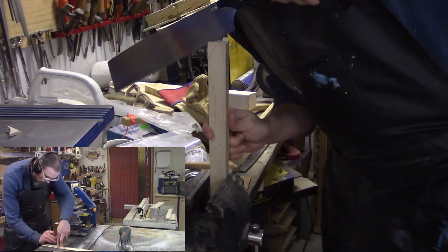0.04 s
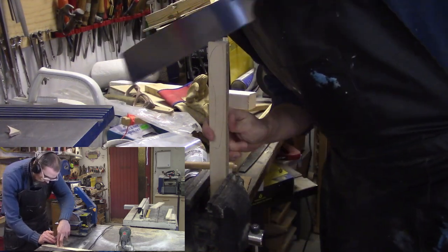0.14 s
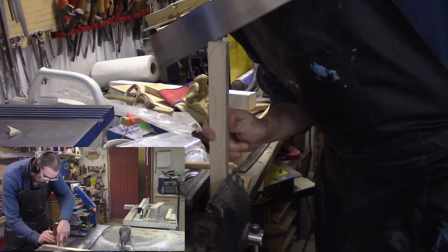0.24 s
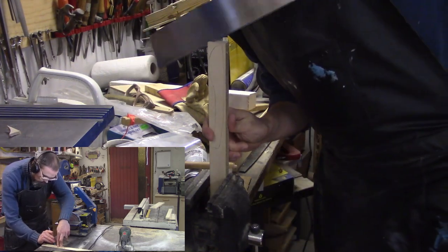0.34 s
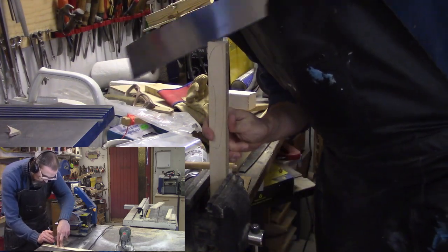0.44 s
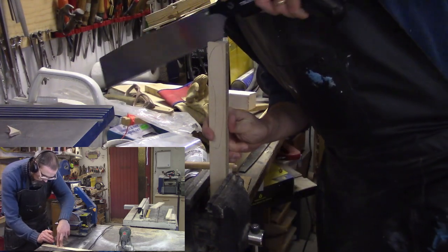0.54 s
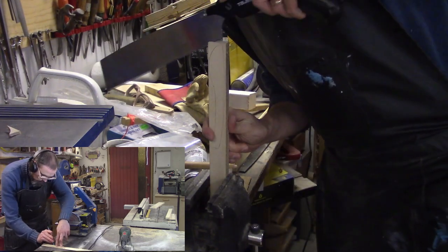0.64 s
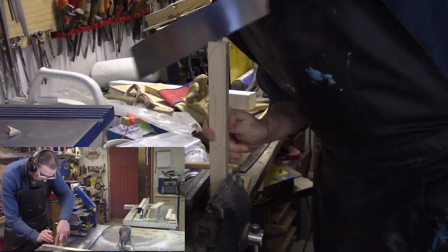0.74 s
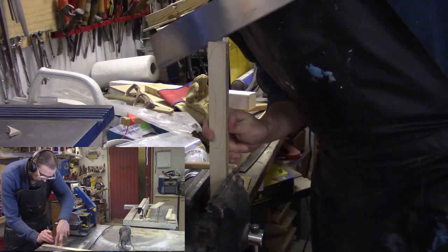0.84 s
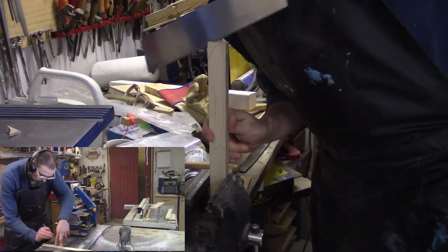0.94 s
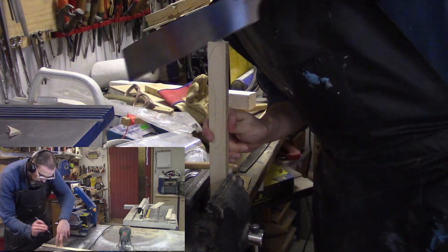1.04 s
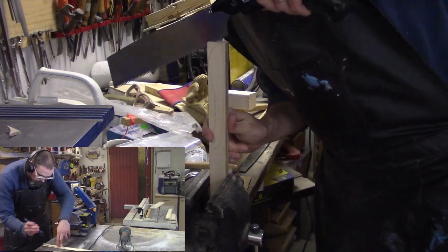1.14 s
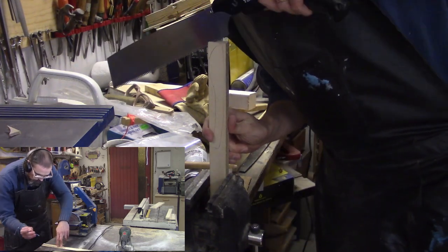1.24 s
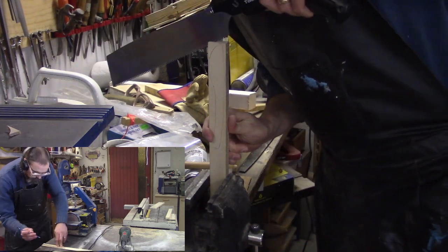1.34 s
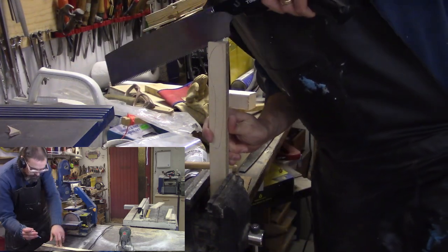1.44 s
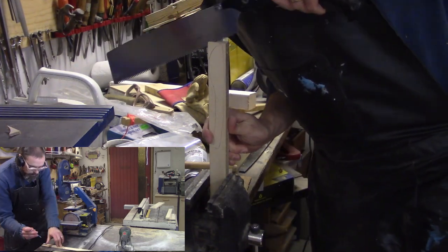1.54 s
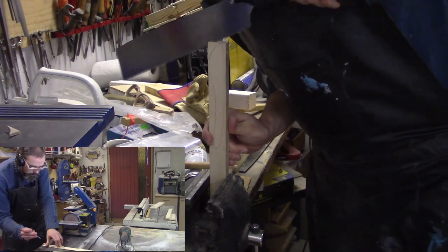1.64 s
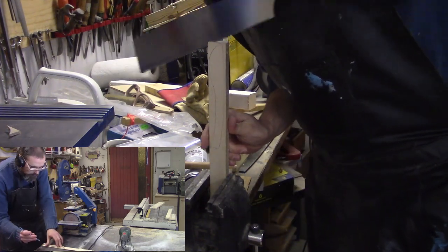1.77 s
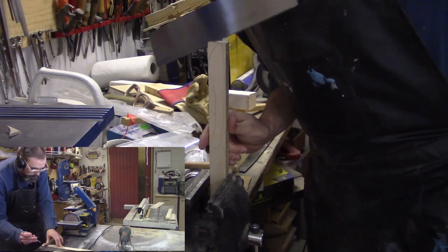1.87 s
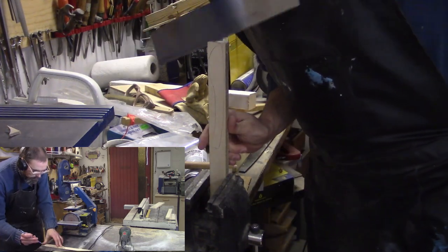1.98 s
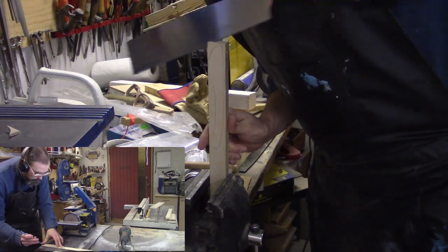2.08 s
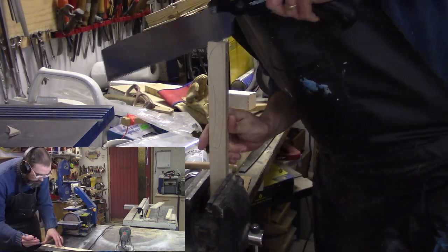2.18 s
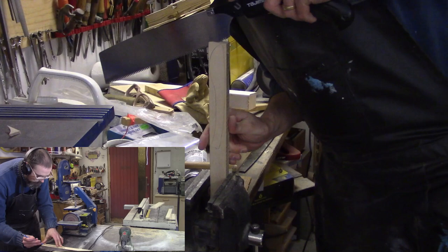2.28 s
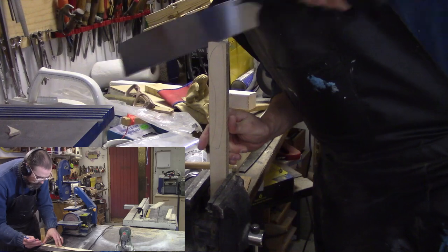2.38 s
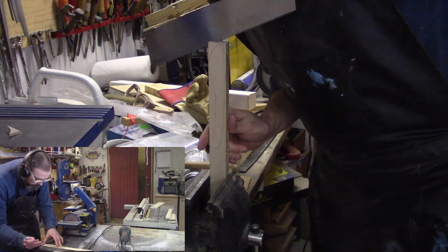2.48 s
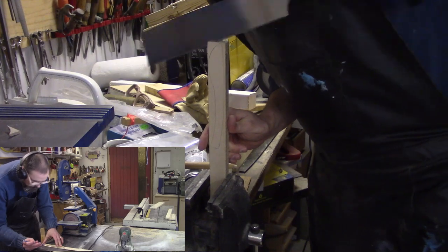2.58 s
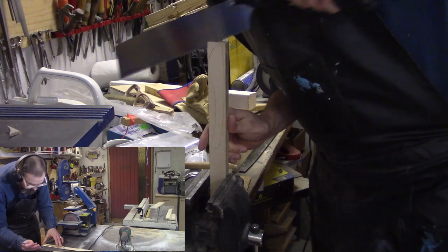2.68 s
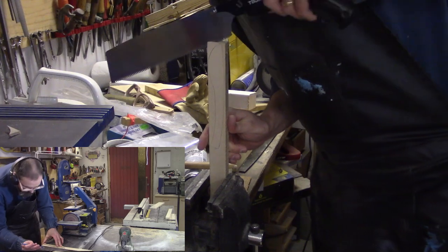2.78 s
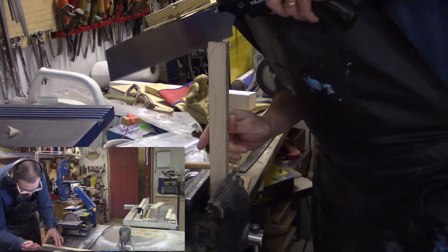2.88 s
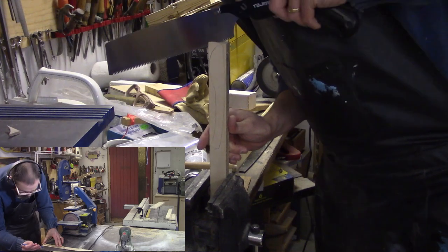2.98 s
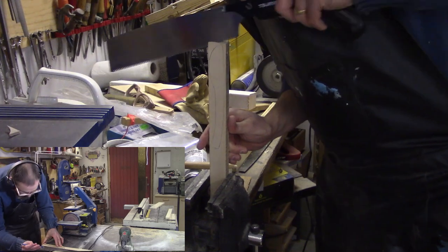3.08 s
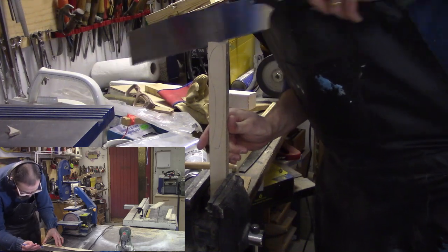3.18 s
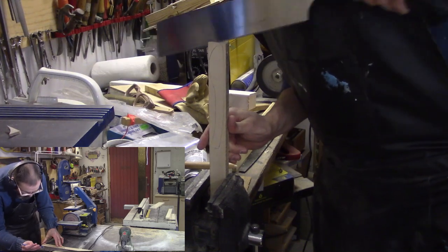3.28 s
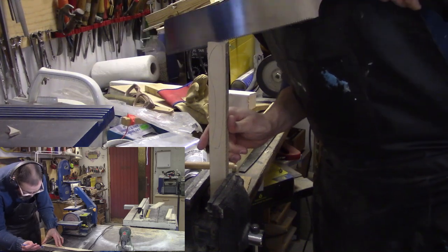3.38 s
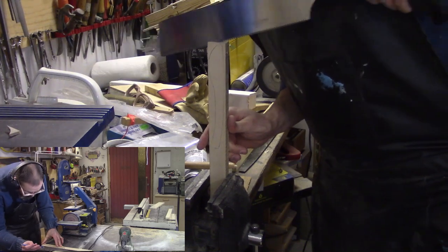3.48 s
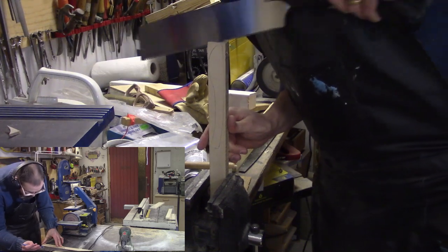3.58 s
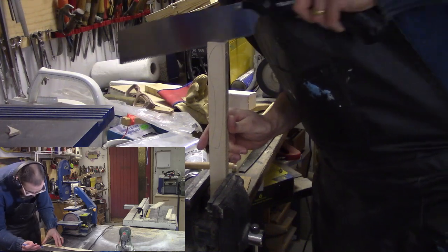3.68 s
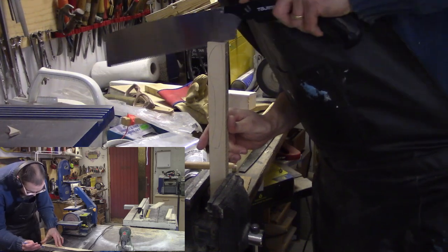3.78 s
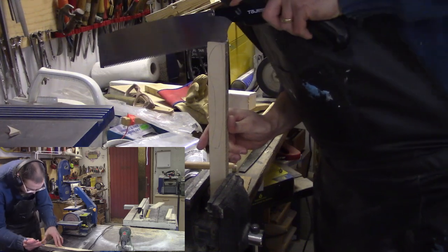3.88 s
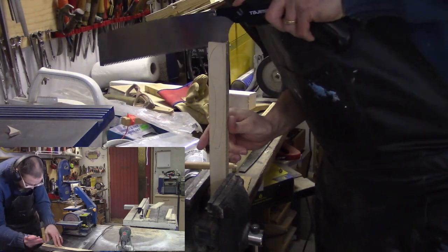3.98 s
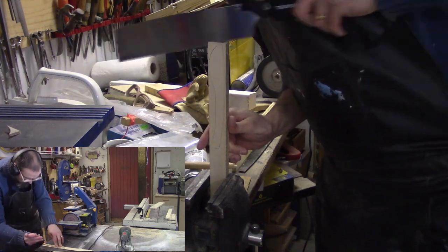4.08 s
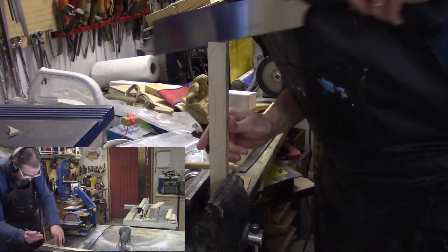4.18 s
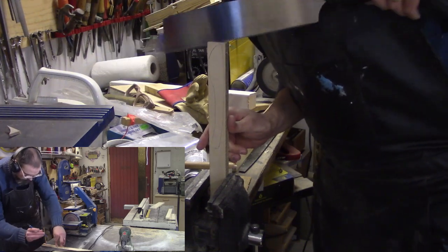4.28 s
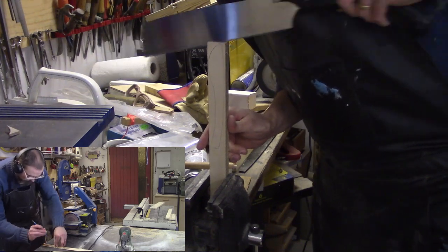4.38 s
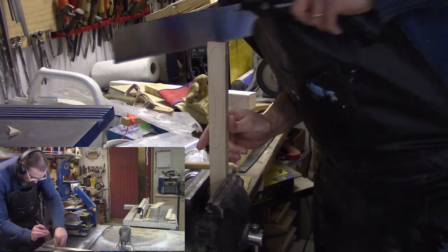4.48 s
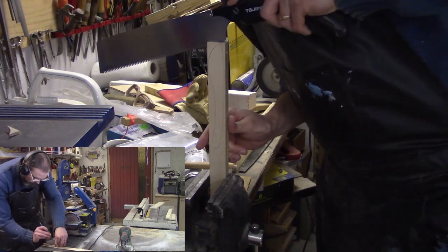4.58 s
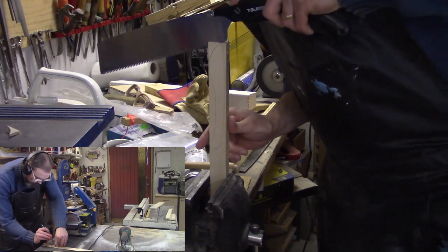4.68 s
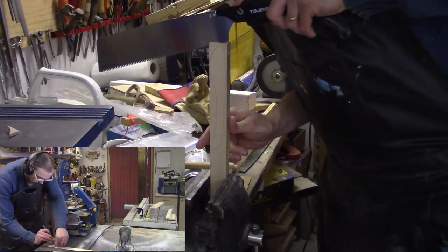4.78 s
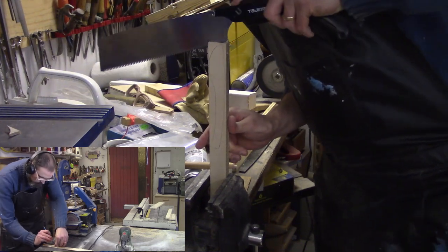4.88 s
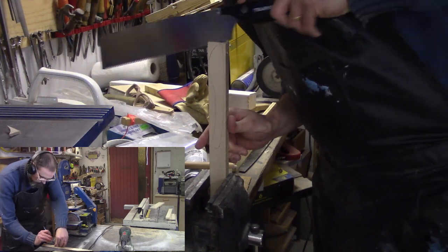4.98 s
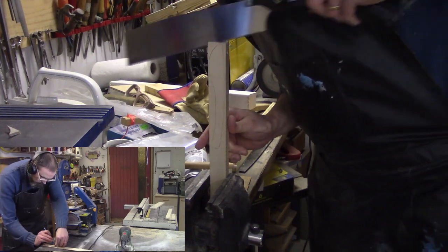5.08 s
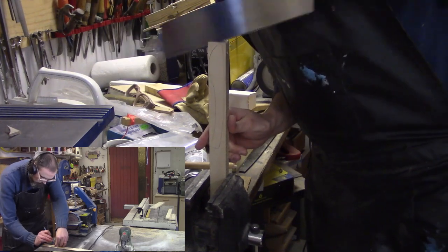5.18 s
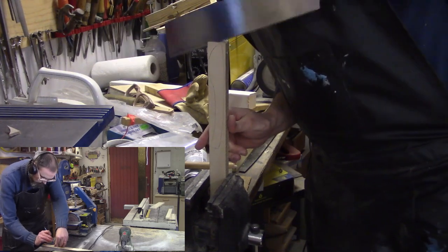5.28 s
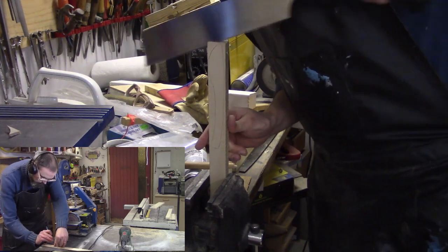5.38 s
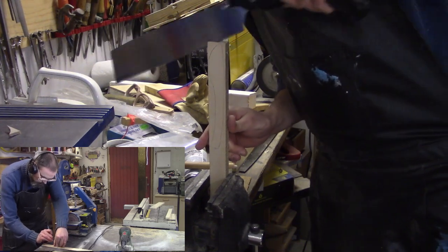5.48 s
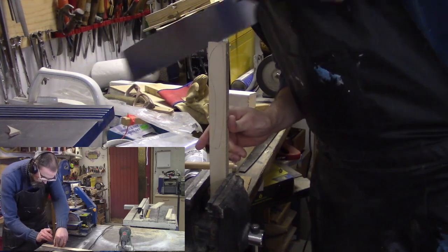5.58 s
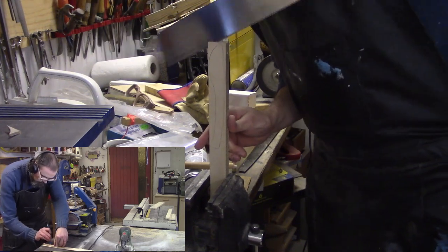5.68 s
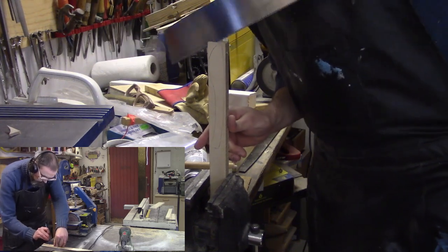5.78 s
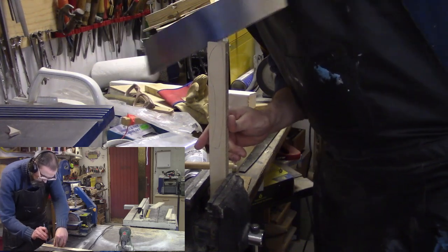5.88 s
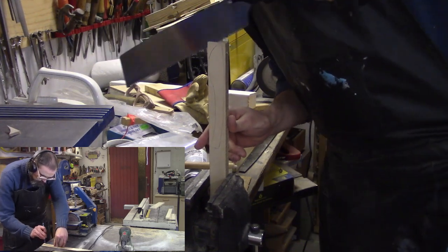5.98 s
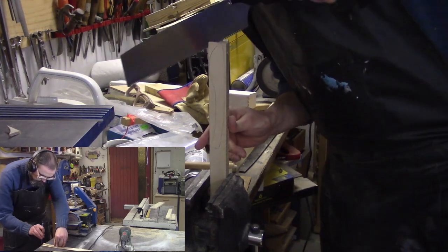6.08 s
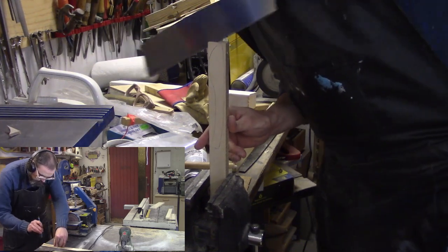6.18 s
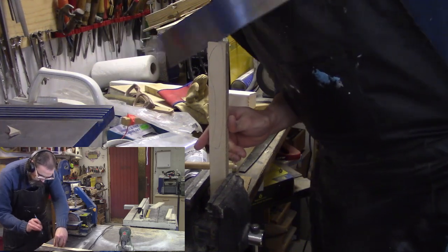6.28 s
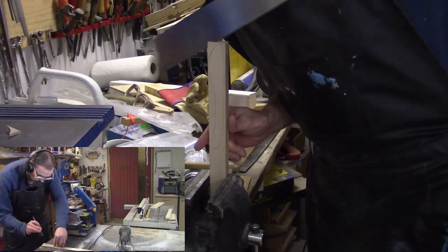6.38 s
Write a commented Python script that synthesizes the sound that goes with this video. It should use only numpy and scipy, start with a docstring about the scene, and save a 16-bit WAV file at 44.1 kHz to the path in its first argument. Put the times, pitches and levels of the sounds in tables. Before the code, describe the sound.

A close, nearly centred hand saw works through a thin upright board in a vise, in a small, dry workshop with faint steady background noise. From 0 to 1.25 seconds five brisk strokes alternate, each about a quarter second: gritty rasping, bright steel edge and a loud hollow wooden groan around the low mids, often sliding down. At about 1.25 a thin squeak and faint ringing fill a gap, followed by a weak, soft return from 1.5 to 2. Strong strokes bite near 2.1 and 2.7, with knocks and buzzing chatter. Longer, steadier strokes come around 3.15 to 3.4 and 3.5 to 3.9. Forceful catches mark 4.1 and 4.5; after a short ringing gap, sawing resumes at 5.05, peaks harshly near 5.5, and continues in quick alternating strokes to 6.4. Tiny high squeaks touch turnarounds near 2.85, 4.3 and 5.8.

```python
"""Workshop, close microphone: a hand saw strokes to and fro through a thin upright board held in a vise.
From the first stroke fibres tear in a dense rasp that rings the steel, and board modes sing as the teeth pass.
From 0.3 s board and blade modes ring on as the teeth let go; from 0.4 s the blade also chatters in the kerf,
mostly on cutting strokes. From 1.25 s a few thin gliding squeaks come high in the steel.
Sawing goes on to the end at 6.4 s; short room scatter and steady shop noise lie behind it throughout."""
import sys
import numpy as np
from scipy import signal
from scipy.fft import rfft, irfft, next_fast_len
from scipy.io import wavfile
from scipy.ndimage import uniform_filter1d

SR = 44100
rng = np.random.default_rng(int(sys.argv[2]) if len(sys.argv) > 2 else 0)


def bounce(signal):
    """Save signal as a 16-bit WAV file at the path given by the first command-line argument."""
    frames = np.transpose(np.atleast_2d(signal))
    limited = np.clip(frames, -1, 1)
    pcm = np.round(limited * 32767).astype(np.int16)
    wavfile.write(sys.argv[1], SR, pcm)


def voltage_ratio(level):
    """Linear amplitude factor for a level in decibels (scalar or array-like)."""
    return 10 ** (np.asarray(level, float) / 20)


N = 283563  # samples

# One curve a stroke, cutting and return in turn:
# (time [s], tearing of the teeth [dB], shaking of the board [dB])
STROKE_CURVES = [
    [(0.0, -28.5, -8.5), (0.028, -25, -15), (0.04, -33, -10.5), (0.068, -30.5, -14.5), (0.13, -56, -33),
     (0.14, -52, -32.5)],
    [(0.14, -52, -33.5), (0.154, -53.5, -29), (0.17, -33.5, -23), (0.216, -23.5, -10), (0.26, -29.5, -12.5),
     (0.28, -26, -11), (0.308, -37.5, -16.5), (0.375, -61, -35)],
    [(0.375, -55, -35), (0.417, -40.5, -21), (0.431, -29.5, -12.5), (0.457, -38, -14.5), (0.473, -27, -12),
     (0.581, -28.5, -14), (0.621, -45, -23.5), (0.68, -55, -34)],
    [(0.68, -56, -39), (0.694, -52, -36), (0.724, -32.5, -15.5), (0.778, -28.5, -16.5), (0.812, -29, -16.5),
     (0.868, -35.5, -24), (0.93, -57, -33)],
    [(0.93, -58, -38.5), (1.01, -36.5, -16.5), (1.06, -29.5, -11), (1.072, -21.5, -10), (1.144, -27.5, -15),
     (1.164, -31.5, -12), (1.248, -54, -35.5), (1.33, -61.5, -59)],
    [(1.46, -59, -61), (1.484, -64, -39.5), (1.548, -48, -36), (1.62, -42, -25.5), (1.82, -38.5, -25),
     (1.866, -38, -20.5), (1.94, -36.5, -22.5), (2.02, -63, -41.5)],
    [(2.02, -63, -40), (2.068, -40, -23), (2.114, -38.5, -19), (2.14, -18, -9.5), (2.2, -27.5, -6),
     (2.236, -30.5, -14.5), (2.28, -48.5, -23), (2.34, -61, -43)],
    [(2.34, -62, -40), (2.372, -38.5, -27), (2.406, -24, -15.5), (2.486, -29, -25), (2.502, -28.5, -22.5),
     (2.548, -41, -32.5), (2.568, -65, -48), (2.59, -47.5, -46)],
    [(2.59, -56, -43.5), (2.674, -29.5, -13.5), (2.724, -18, -18), (2.742, -29.5, -12.5),
     (2.758, -25.5, -13), (2.848, -57.5, -35.5), (2.93, -64, -53)],
    [(3.1, -64, -67), (3.12, -41.5, -48), (3.144, -39.5, -20), (3.162, -31.5, -17.5), (3.3, -27.5, -14),
     (3.39, -39, -25.5), (3.418, -57, -35), (3.47, -65, -47)],
    [(3.47, -61, -45), (3.542, -41, -20), (3.556, -39.5, -22), (3.608, -29, -11.5), (3.764, -32.5, -16),
     (3.91, -47.5, -28.5), (3.938, -56, -36.5), (4.0, -71, -57)],
    [(4.03, -71, -53), (4.058, -41, -32), (4.138, -22, -12.5), (4.154, -22, -12), (4.172, -23, -21),
     (4.23, -26.5, -20), (4.282, -36, -25), (4.33, -55, -43)],
    [(4.33, -56, -44), (4.37, -38.5, -26), (4.468, -29, -8), (4.534, -18, -12.5), (4.562, -23, -13),
     (4.57, -18, -11), (4.736, -65.5, -44), (4.78, -61, -51.5)],
    [(5.03, -63, -62), (5.048, -32, -4.5), (5.082, -24, -15), (5.144, -33, -17), (5.16, -29, -13),
     (5.208, -28, -23.5), (5.232, -28, -17.5), (5.33, -58, -45)],
    [(5.33, -55, -40), (5.386, -40, -19.5), (5.41, -34.5, -27), (5.432, -33.5, -9.5), (5.466, -19.5, -11.5),
     (5.486, -27.5, -7), (5.516, -17.5, -10.5), (5.59, -48, -19)],
    [(5.59, -52, -27), (5.606, -40, -28), (5.634, -35, -17), (5.652, -30, -22.5), (5.718, -26.5, -20),
     (5.764, -32.5, -23), (5.804, -50.5, -37.5), (5.83, -46, -38)],
    [(5.83, -49, -38), (5.882, -33.5, -20.5), (5.908, -38.5, -28.5), (5.936, -25.5, -11.5),
     (6.034, -23.5, -10.5), (6.082, -39, -18.5), (6.104, -51, -28), (6.14, -44, -35)],
    [(6.14, -58, -40), (6.158, -40, -31.5), (6.192, -34.5, -19.5), (6.268, -33.5, -19.5),
     (6.32, -35, -25.5), (6.392, -58.5, -42), (6.4, -63, -43), (6.43, -45, -34)],
]
# How each stroke leans on the work: (scrape [dB], bench thud [dB], extra treble gain [dB])
STROKE_LEAN = [(0.5, -18.5, 0), (-0.5, -22.5, 1.5), (0.5, -18.5, 0), (-2, -24.5, 3), (1, -16, 0),
               (-1.5, -15, 1.5), (1, -19.5, 1), (-3, -15.5, -1), (-2, -16.5, 0.5), (-1.5, -18, 0),
               (-2, -18.5, -2), (-2, -14.5, -0.5), (0, -19, -0.5), (-1, -16, 0.5), (-2.5, -16, -0.5),
               (-3, -20.5, 2), (-0.5, -19.5, -1), (-1.5, -19, 1.5)]
RASP_DB, KNOCK_DB = 2, -1  # over the tearing, over the shaking
SCRAPE_FROM_BOARD = 0.49  # share of the scrape's dB that follows the shaking; the rest follows the tearing
BENCH_PER_BOARD_DB = 0.82  # bench dB per dB of shaking
TREBLE_HZ = 7000  # corner of the extra treble

# Broad colour of the low scrape: (frequency [Hz], relative level [dB per Hz])
SCRAPE_COLOUR = [(320, -41.5), (550, 4.5), (746, 1.5), (828, -6.5), (981, -2.5), (1130, -5.5), (1250, -4),
                 (2600, -18), (3380, -26), (5720, -120)]
# Broad colour of the bright rasp: (frequency [Hz], relative level [dB per Hz])
RASP_COLOUR = [(1410, -8), (2400, -4), (3800, -6), (4370, -5), (5420, -10), (6980, -9), (8720, -12),
               (10000, -11), (15000, -20)]
# Blade resonances: (frequency [Hz], width [Hz], cutting level over the tearing [dB], return level [dB])
BLADE_MODES = [(655, 29, -4.5, -6), (764, 28, -10, -10), (994, 82, -3, -1.5), (1207, 21.4, -2, -2),
               (1975, 175, -16, -4), (2336, 56, -1, -27.5), (2884, 65, -2, 0), (3089, 50, 4, -17),
               (3536, 67, -10, -5), (4258, 65, 4, -5), (4680, 37, -2.5, 6), (5075, 46, 1, -2.5),
               (5670, 45, 4, -12), (5770, 31.6, 0, -17.5), (6453, 33, 1, -13), (7004, 180, 1, 2.5),
               (7316, 49, -3, 4), (8080, 88, -11, -1.5), (9760, 150, -0.5, 5.5), (11294, 70, -6, 1)]
WAVER_DB, DRIFT_DB = 2.5, 1.5  # fast and slow spread of each blade resonance
STEEL_DB = -4.0  # gain on tearing and blade together
GRIT_SPREAD_DB, TEAR_DEPTH = 1.5, 0.15  # unevenness of the fibres, depth of the chatter beat on the tearing

# The blade catches hard and slips free:
# (time [s], rasp level before SLIP_DB [dB], board thump level before the board's resonances [dB])
HARD_CATCHES = [(0.0175, -14, -28), (0.172, -21, -20), (0.2167, -18, -17), (0.411, -25, -15),
                (0.727, -17, -26), (1.009, -16, -29), (1.489, -37.5, -32), (2.047, -31, -24.5),
                (2.367, -22, -25), (3.121, -31, -32), (4.054, -25, -29), (5.378, -20, -23),
                (6.161, -24, -24), (0.2733, -9, -16), (0.47, -17, -11), (0.5377, -16, -22.5),
                (1.0422, -33.5, -5.5), (1.07, -6.5, -11), (2.0717, -24.5, -25), (2.134, -13, -19),
                (2.2224, -13, -26), (2.394, -18, -13), (2.6873, -9, -8), (2.714, -4, -4),
                (3.5842, -15, -12), (3.6349, -19, -13), (4.118, -8, -12.5), (4.4484, -14, -11),
                (4.511, -1, -26), (4.569, -9, -21.5), (5.049, -12, -33), (5.0764, -6.5, -20.5),
                (5.465, -5, -15), (5.5081, 2, -13), (5.929, -19, -9), (6.0235, -21, -13.5)]
SLIP_DB, SLIP_RISE_S, SLIP_FALL_S = -18.5, 0.00138, 0.0037
# Lighter catches come at random; the first two levels are the strongest, over the tearing and the shaking
SNAGS_PER_S = 14
SNAG_DB, SNAG_THUMP_DB, SNAG_SPREAD_DB = 15, -4.5, 4.5

# Board resonances: (frequency [Hz], width [Hz], relative level [dB])
BOARD_MODES = [(233, 34, -3), (265.4, 35, -4), (320, 33, 2), (385, 40, 1), (448.5, 64.7, -2),
               (520.8, 74, -13.5)]
# Bench resonances: (frequency [Hz], width [Hz], relative level [dB])
BENCH_MODES = [(115, 22.5, -27), (150, 29, 8.5), (80, 31.5, -7.5)]
# Board modes sing out as the teeth pass: (start [s], end [s], from [Hz], to [Hz], level [dB])
SINGING_GLIDES = [(.01, .09, 297.6, 306, -18), (.19, .32, 347.8, 315.3, -6.5), (.19, .24, 406, 374, -14),
                  (.46, .55, 388.9, 308, -16), (.73, .85, 369.8, 394, -10.5), (1.04, 1.19, 390.8, 321, -14),
                  (1.84, 1.94, 453, 427.4, -19), (2.04, 2.12, 252.6, 246, -18.5),
                  (2.11, 2.19, 409, 358, -10), (2.16, 2.28, 329.8, 304.7, -13), (2.64, 2.73, 256, 347, -19),
                  (2.7, 2.79, 356.9, 320, -17), (3.58, 3.71, 320, 320, -13.5),
                  (3.66, 3.73, 238.3, 234.1, -19), (4.1, 4.18, 367, 411, -16),
                  (4.18, 4.32, 333.2, 291.4, -15), (4.35, 4.44, 281, 256, -20), (4.42, 4.51, 392, 385, -10),
                  (4.49, 4.63, 283.7, 259, -12.5), (5.2, 5.27, 294, 297, -18),
                  (5.42, 5.5, 403.4, 320, -15.5), (5.46, 5.59, 320, 307.4, -14),
                  (5.66, 5.78, 391, 361.5, -12), (5.94, 6.04, 366.6, 367, -17.5),
                  (6.01, 6.13, 344, 291, -19), (6.21, 6.31, 430.7, 421, -24)]
# The blade bounces regularly in the kerf: (start [s], end [s], from [Hz], to [Hz], level [dB])
CHATTER_GLIDES = [(.4, .62, 134.3, 115, -31), (.99, 1.22, 134.2, 109.2, -24.5),
                  (2.1, 2.24, 128.7, 121.5, -32), (2.66, 2.8, 125.3, 105.4, -25.5),
                  (3.16, 3.38, 99.6, 111.5, -29.5), (3.52, 3.8, 150, 154.1, -27),
                  (4.46, 4.64, 139.6, 134.6, -22), (5.17, 5.29, 158.8, 147, -39.5),
                  (5.45, 5.58, 127.1, 112.7, -26.5), (5.92, 6.08, 124.2, 117.1, -25)]
# Chatter harmonics 1, 2, ..: one column, level over the glide's own [dB]
CHATTER_HARMONICS = [-0.5, 6, 4, -3.5, -6.5, -8, -4.5]
GLIDE_JITTER, GLIDE_SCATTER_DB = 0.014, 1.5  # fraction of the pitch, spread of the level

# The teeth let go: (time [s], board level [dB], blade level [dB], blade tilt [dB per octave])
LETTING_GO = [(.3, -31, -62, 0), (0.599, -50, -52, -4), (.88, -42.5, -65.5, 0), (1.23, -40, -52, -4),
              (2.26, -45, -58, 9.5), (2.55, -51, -56, 0), (2.84, -38, -64, 0), (3.4, -44.5, -59, 0),
              (3.89, -47, -60, 5), (4.3, -55, -52, 2), (4.67, -38.5, -55.5, 3), (5.26, -55, -54, 0)]
# Lightly damped board modes: (frequency [Hz], T60 [s], level after a cut [dB], level after a return [dB])
BOARD_RING_MODES = [(287, 0.46, 2.5, -25), (759, 0.21, -30, 5)]
# Lightly damped blade modes: (frequency [Hz], T60 [s], level after a cut [dB], level after a return [dB])
BLADE_RING_MODES = [(1810, 1.5, -10.5, -24), (2670, 1.01, 1, 1.5), (5570, 1.5, -20, -13),
                    (8530, 1.07, -13.5, -30.5)]
TILT_PIVOT_HZ, RING_FLUTTER_DB = 2695, 2.5
REGRIP_S = 0.03  # delay and time constant with which the next stroke damps the ringing

# Thin squeaks as the blade turns round: (start [s], end [s], from [Hz], to [Hz], level [dB])
SQUEAK_GLIDES = [(1.25, 1.38, 11050, 11650, -66), (1.35, 1.41, 12500, 11500, -71),
                 (2.84, 2.89, 12300, 10700, -65), (4.3, 4.36, 13700, 13000, -64),
                 (5.77, 5.85, 12800, 11200, -62)]
SQUEAK_JITTER = 0.003  # fraction of the pitch

ROOM_T60_S, ROOM_DB = 0.24, -14.5
# Colour of the shop noise: (frequency [Hz], relative level [dB per Hz])
SHOP_COLOUR = [(18, -67), (30, -28), (107, -5), (253, -7), (288, -1.5), (404, -12.5), (1780, -8.5),
               (3320, -23), (5730, -24), (11900, -33), (15000, -50)]
SHOP_DB = -55
# Stereo spread of the sawing: (frequency [Hz], side minus mid [dB])
SAW_SIDE = [(60, -23.5), (110, -41.5), (200, -42), (370, -36.5), (690, -25), (1270, -31), (2340, -22),
            (4300, -16.5), (7920, -19), (14600, -18)]
# Stereo spread of the shop noise: (frequency [Hz], side minus mid [dB])
SHOP_SIDE = [(100, -9.5), (400, -8), (3000, -9.5), (12000, -8)]
MIC_LOW_HZ, MIC_TOP_HZ = 69.5, 14950


def unit(x):
    """Scale to rms 1."""
    return x / np.sqrt(np.mean(x ** 2))


def shape(x, points):
    """Colour a sound by (frequency [Hz], gain [dB]) points, joined on a log frequency axis."""
    hz, db = np.transpose(points)
    n = next_fast_len(N)
    f = np.maximum(np.arange(n // 2 + 1) * SR / n, 1)
    gain = voltage_ratio(np.interp(np.log(f), np.log(hz), db))
    return irfft(rfft(x, n) * gain, n)[:N]


def ring(x, hz, width_hz):
    """One resonance, gain 1 at its centre."""
    return signal.lfilter(*signal.iirpeak(hz, hz / width_hz, fs=SR), x)


def flicker(rate):
    """Smooth random wander, about rate new levels a second, rms 1."""
    k = int(SR / rate)
    levels = rng.standard_normal(N // k + 1)
    return unit(uniform_filter1d(np.repeat(levels, k), k)[:N])


def grit(spread_db):
    """Dense fibre snaps of uneven size: noise whose level flickers quickly."""
    return unit(rng.standard_normal(N) * voltage_ratio(spread_db * flicker(900)))


def glides(table, jitter):
    """Place in time, phase and swell of each gliding tone, with wandering pitch and level."""
    for start, end, from_hz, to_hz, db in table:
        i, n = int(start * SR), int((end - start) * SR)
        hz = np.linspace(from_hz, to_hz, n) * (1 + jitter * flicker(80.5)[:n])
        level = voltage_ratio(db + GLIDE_SCATTER_DB * flicker(45.3)[:n])
        swell = level * signal.windows.tukey(n, 0.6)
        yield slice(i, i + n), 2 * np.pi * np.cumsum(hz) / SR, swell


def blade(beat, scrape, rasp, jolt, cutting):
    """Tearing noise plus blade resonances that differ between cut and return and waver as the contact moves."""
    pulse = (1 + TEAR_DEPTH * beat) * voltage_ratio(1.7 * flicker(30))
    force = grit(GRIT_SPREAD_DB)
    low = unit(shape(force, SCRAPE_COLOUR)) * scrape
    bright = unit(shape(force, RASP_COLOUR)) * rasp * voltage_ratio(0.64 * flicker(22.096))
    tear = pulse * (low + bright)
    struck = tear * (1 + 1.1 * jolt)  # a slip shakes the steel harder than steady tearing
    cut, back = struck * cutting, struck * (1 - cutting)
    peaks = np.zeros(N)
    for hz, width_hz, cut_db, back_db in BLADE_MODES:
        waver = voltage_ratio(WAVER_DB * flicker(24) + DRIFT_DB * flicker(4))
        peaks += ring((voltage_ratio(cut_db) * cut + voltage_ratio(back_db) * back) * waver, hz, width_hz)
    return voltage_ratio(STEEL_DB) * (tear + peaks)


def catches(t, tearing, shaking):
    """Times and levels of the hard catches and of random snags, as strong as the stroke allows."""
    at, size, thud = rng.random((int(SNAGS_PER_S * N / SR), 3)).T
    at = at * t[-1]
    snag_db = np.interp(at, t, tearing) + SNAG_DB + SNAG_SPREAD_DB * np.log(size)
    thump_db = np.interp(at, t, shaking) + SNAG_THUMP_DB + SNAG_SPREAD_DB * np.log(thud)
    return np.hstack([np.transpose(HARD_CATCHES), [at, snag_db, thump_db]])


def judder(s, db):
    """Force of the slips: each swells fast and dies away."""
    kicks = np.zeros(N)
    kicks[(s * SR).astype(int)] = voltage_ratio(db)
    t = np.arange(int(0.08 * SR)) / SR
    swell = (1 - np.exp(-t / SLIP_RISE_S)) * np.exp(-t / SLIP_FALL_S)
    return signal.fftconvolve(kicks, swell / swell.max())[:N]


def knocking(modes, gain):
    """Random fibre breaks knock a wooden body, each mode a doubled resonance of alternating sign."""
    power = sum(voltage_ratio(db) ** 2 * width_hz for _, width_hz, db in modes) / SR
    force = grit(GRIT_SPREAD_DB) * gain / np.sqrt(power)
    out = np.zeros(N)
    for k, (hz, width_hz, db) in enumerate(modes):
        twice = ring(ring(force, hz, 2 * width_hz), hz, 2 * width_hz)
        out += (-1) ** k * voltage_ratio(db) * twice / 2
    return out


def singing():
    """Board modes sing out as the teeth pass: near-pure tones, mostly gliding down, with a weak octave."""
    out = np.zeros(N)
    for span, phase, swell in glides(SINGING_GLIDES, GLIDE_JITTER):
        out[span] += np.sqrt(2) * swell * (np.sin(phase) + 0.081 * np.sin(2 * phase))
    return out


def chatter():
    """Regular blade bounces as a stack of harmonics, and the beat they put on the tearing."""
    out, beat = np.zeros(N), np.zeros(N)
    for span, phase, swell in glides(CHATTER_GLIDES, GLIDE_JITTER):
        stack = sum(voltage_ratio(db) * np.cos((k + 1) * phase) for k, db in enumerate(CHATTER_HARMONICS))
        out[span] += swell * stack
        beat[span] += np.cos(phase) * swell / swell.max()
    return out, beat


def rings(starts):
    """Slow modes left sounding as the teeth let go, until the next stroke grips the blade."""
    out, clock = np.zeros(N), np.arange(N) / SR
    modes = BOARD_RING_MODES + BLADE_RING_MODES
    flutter = [RING_FLUTTER_DB * flicker(29.92) for _ in modes]
    for start, board_db, blade_db, tilt_db in LETTING_GO:
        k = np.searchsorted(starts, start)  # strokes begun so far; odd after a cut
        t = np.maximum(clock - start, 0)
        grip = np.exp(-np.maximum(clock - starts[k] - REGRIP_S, 0) / REGRIP_S)
        free = (1 - np.exp(-t / 0.0052)) * grip
        struck = [board_db for _ in BOARD_RING_MODES]
        struck += [blade_db + tilt_db * np.log2(mode[0] / TILT_PIVOT_HZ) for mode in BLADE_RING_MODES]
        for (hz, t60, cut_db, back_db), db, wobble in zip(modes, struck, flutter):
            peak_db = db + (cut_db if k % 2 else back_db)
            level = np.sqrt(2) * voltage_ratio(peak_db - 60 * t / t60 + wobble)
            out += level * free * np.sin(2 * np.pi * hz * t)
    return out


def squeaks():
    """Faint pure glides high in the steel."""
    out = np.zeros(N)
    for span, phase, swell in glides(SQUEAK_GLIDES, SQUEAK_JITTER):
        out[span] += np.sqrt(2) * swell * np.sin(phase)
    return out


def room(x):
    """A cluttered workshop: short scatter as exponentially decaying noise, starting after 4 ms."""
    t = np.arange(int(0.4 * SR)) / SR
    tail = rng.standard_normal(len(t)) * voltage_ratio(-60 * t / ROOM_T60_S) * (t > 0.004)
    return voltage_ratio(ROOM_DB) * signal.fftconvolve(x, tail / np.sqrt(np.sum(tail ** 2)))[:N]


def shop_noise():
    """The quiet shop: steady coloured noise."""
    return voltage_ratio(SHOP_DB) * unit(shape(rng.standard_normal(N), SHOP_COLOUR))


def scene():
    """Saw, board and bench almost dead centre over the quiet shop."""
    t = np.arange(N) / SR
    s, *columns = np.vstack(STROKE_CURVES).T
    tearing, shaking = (np.interp(t, s, c) for c in columns)
    starts = [curve[0][0] for curve in STROKE_CURVES]
    stroke = np.searchsorted(starts, t, "right")  # counts from 1; odd strokes cut
    cutting = uniform_filter1d(1. * (stroke % 2), size=400)
    lean = np.array(STROKE_LEAN, float)[stroke - 1].T
    scrape_db, bench_db, treble_db = uniform_filter1d(lean, size=400)

    rasp, board = voltage_ratio(tearing + RASP_DB), voltage_ratio(shaking + KNOCK_DB)
    scrape = voltage_ratio(scrape_db + SCRAPE_FROM_BOARD * shaking + (1 - SCRAPE_FROM_BOARD) * tearing)
    bench = voltage_ratio(bench_db + BENCH_PER_BOARD_DB * shaking)
    slip_s, slip_db, thump_db = catches(t, tearing, shaking)
    slip = voltage_ratio(SLIP_DB) * judder(slip_s, slip_db)

    bounces, beat = chatter()
    steel = blade(beat, scrape + slip, rasp + slip, slip / (rasp + slip), cutting)
    treble = signal.lfilter(*signal.butter(1, TREBLE_HZ, "high", fs=SR), steel)
    steel = steel + (voltage_ratio(treble_db) - 1) * treble
    wood = knocking(BOARD_MODES, board + judder(slip_s, thump_db)) + knocking(BENCH_MODES, bench)
    wood = wood + singing() + bounces
    saw = wood + steel + rings(starts) + squeaks()

    mid = saw + room(saw)
    shop = shop_noise()
    # a faint side signal, the mid under quick random flicker, keeps left and right loosely unlike
    side = shape(mid * flicker(120), SAW_SIDE) + shape(shop_noise(), SHOP_SIDE)
    return np.array([mid + shop + side, mid + shop - side])


def roll_off(x):
    """The treble ends steeply here."""
    return signal.sosfilt(signal.butter(12, 15190, fs=SR, output="sos"), x)


def record(dry):
    """The microphone drops the deep bass, the input rounds the loudest peaks, and the very top is cut."""
    low_cut = signal.butter(2, MIC_LOW_HZ, "high", fs=SR, output="sos")
    top_cut = signal.ellip(8, 0.2, 60, MIC_TOP_HZ, fs=SR, output="sos")
    rounded = np.tanh(0.857 * signal.sosfilt(low_cut, dry)) / 0.96
    mix = signal.sosfilt(top_cut, rounded)
    return roll_off(mix)


dry = scene()
out = record(dry)
bounce(out)
```